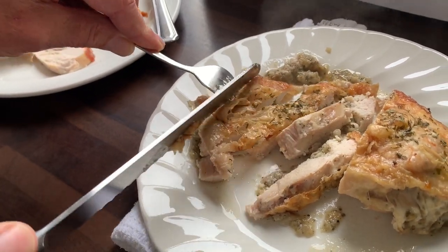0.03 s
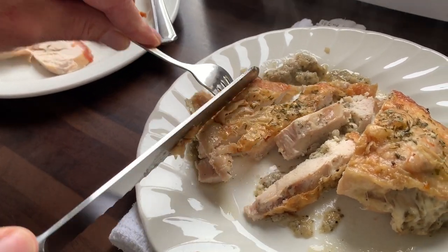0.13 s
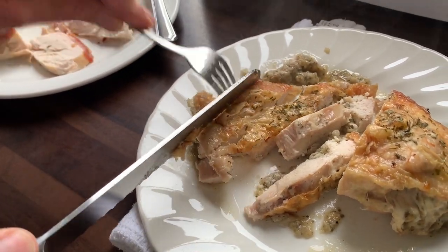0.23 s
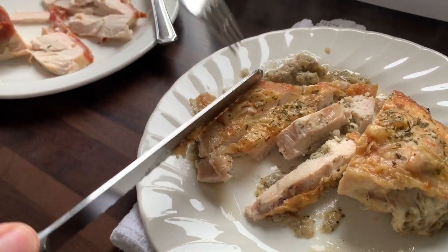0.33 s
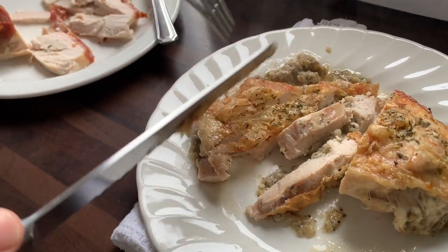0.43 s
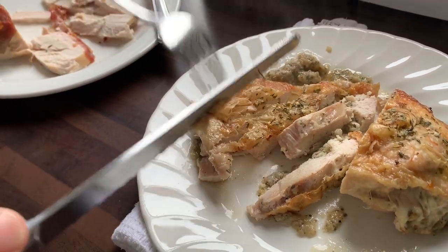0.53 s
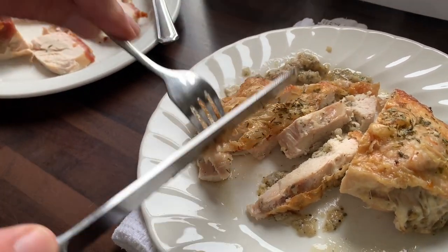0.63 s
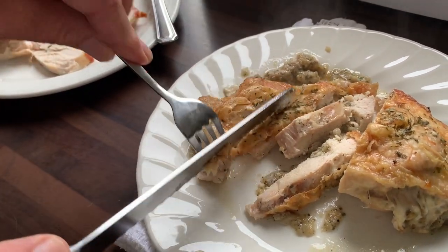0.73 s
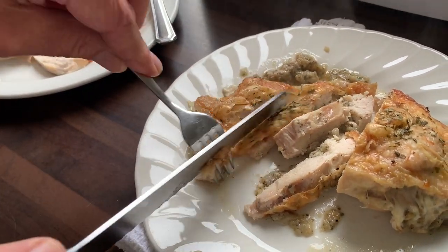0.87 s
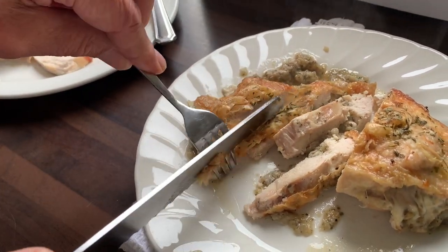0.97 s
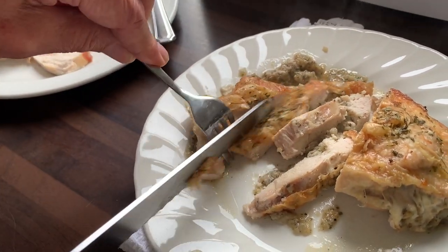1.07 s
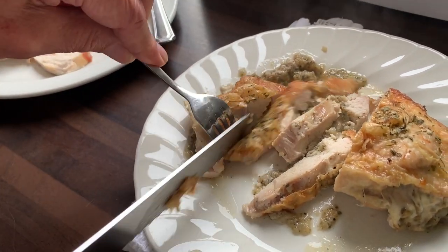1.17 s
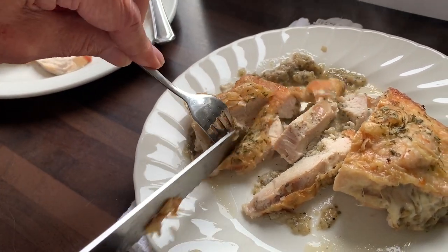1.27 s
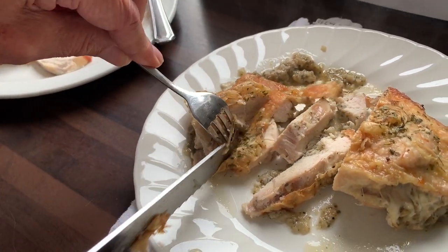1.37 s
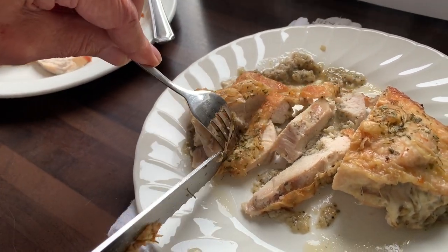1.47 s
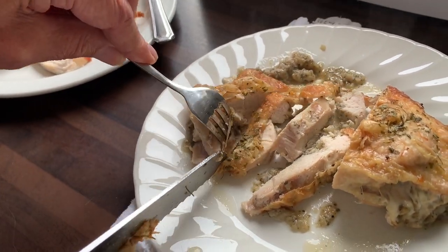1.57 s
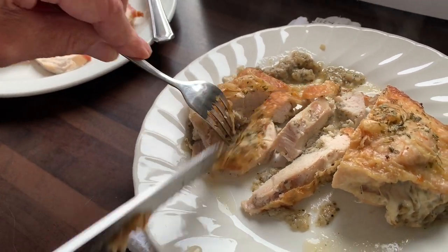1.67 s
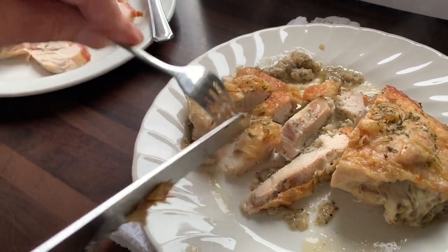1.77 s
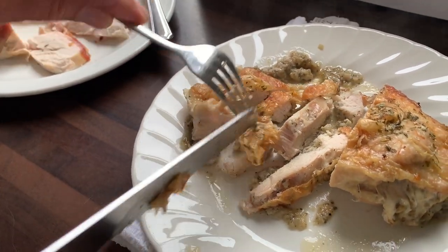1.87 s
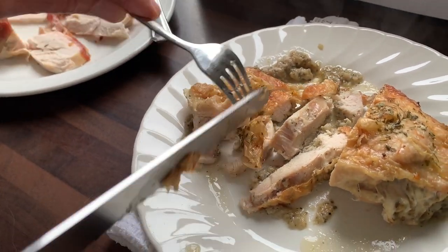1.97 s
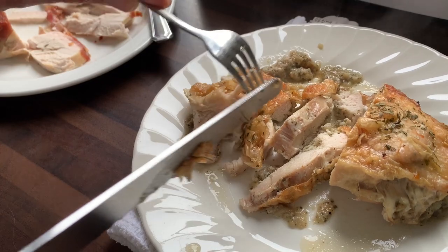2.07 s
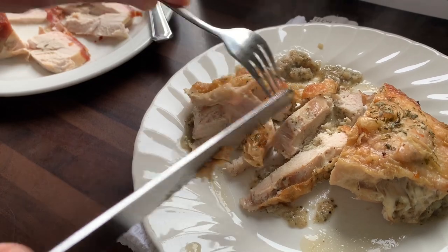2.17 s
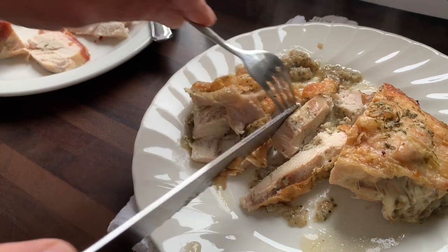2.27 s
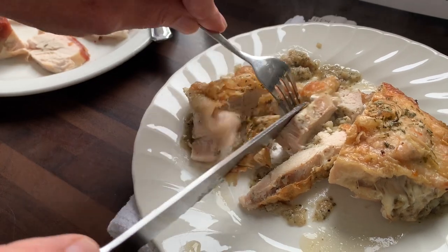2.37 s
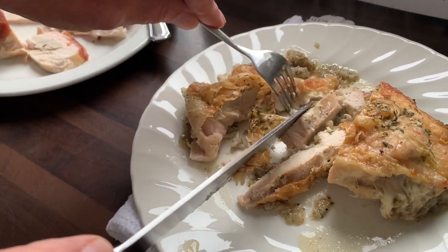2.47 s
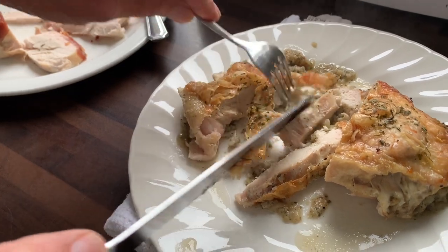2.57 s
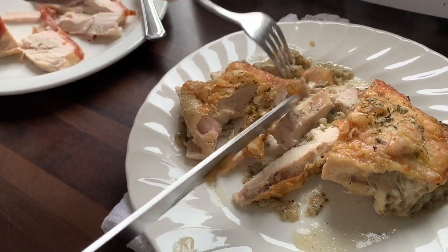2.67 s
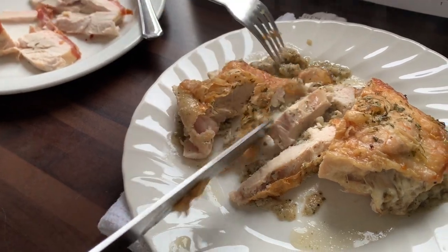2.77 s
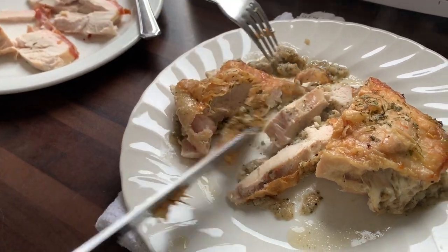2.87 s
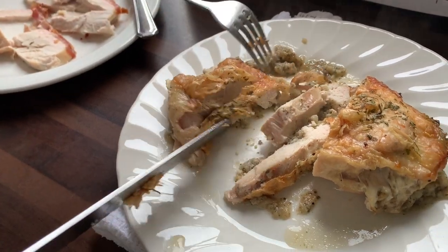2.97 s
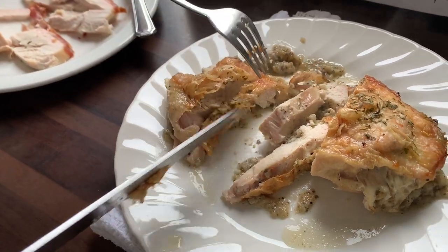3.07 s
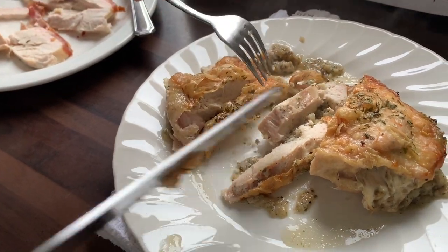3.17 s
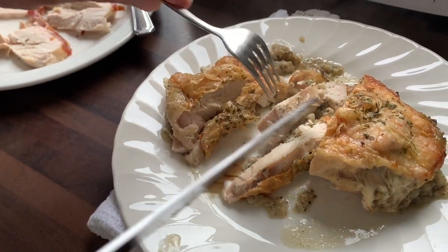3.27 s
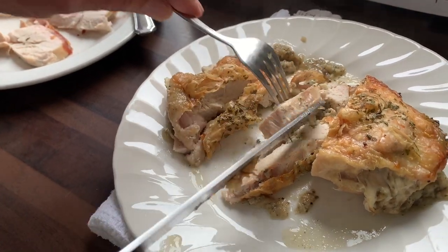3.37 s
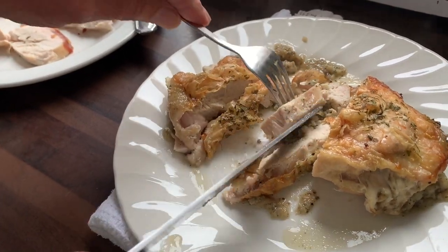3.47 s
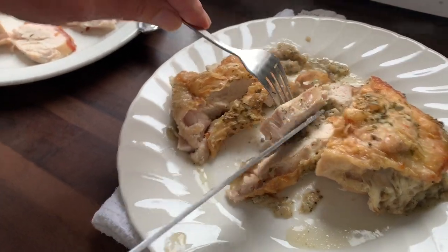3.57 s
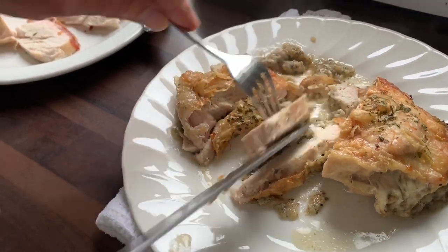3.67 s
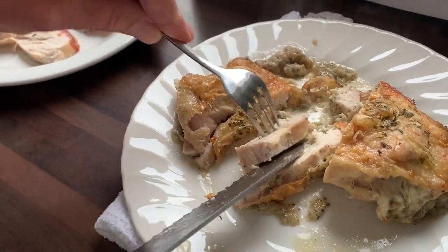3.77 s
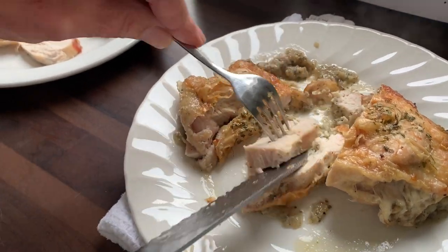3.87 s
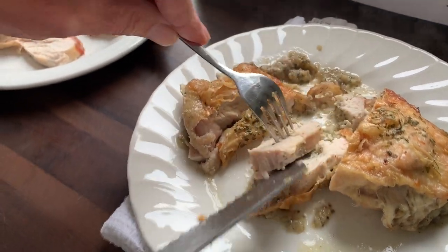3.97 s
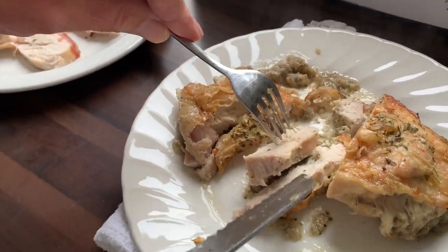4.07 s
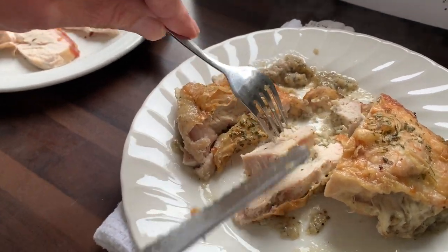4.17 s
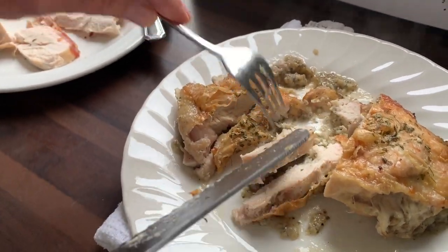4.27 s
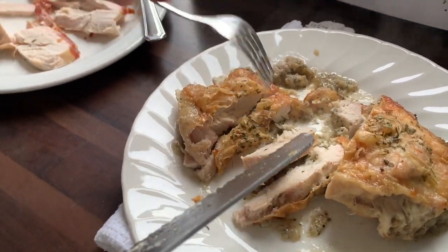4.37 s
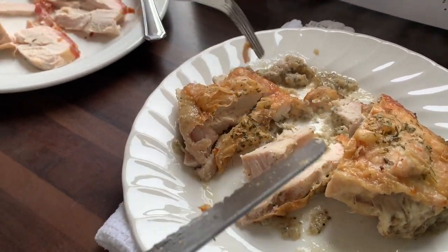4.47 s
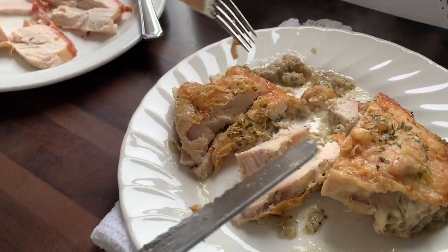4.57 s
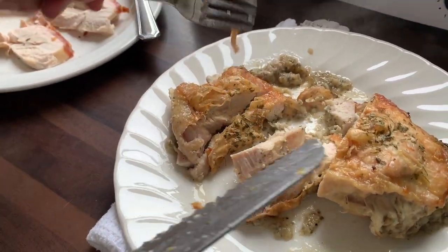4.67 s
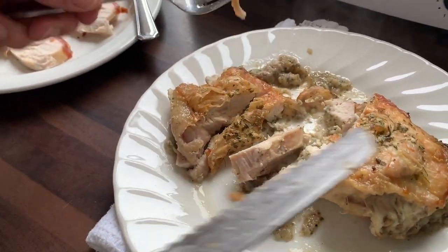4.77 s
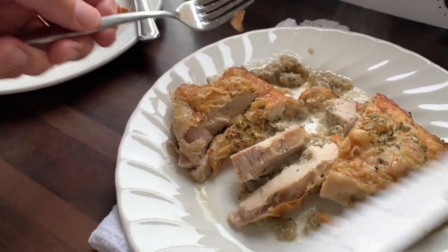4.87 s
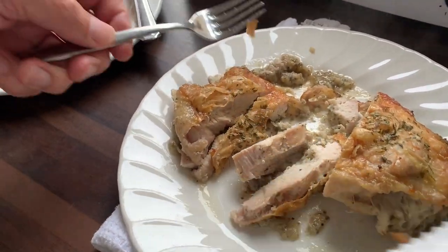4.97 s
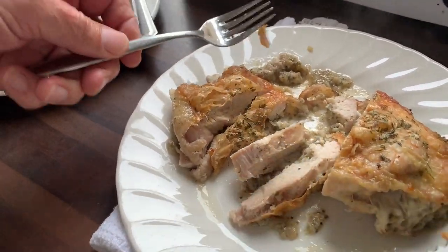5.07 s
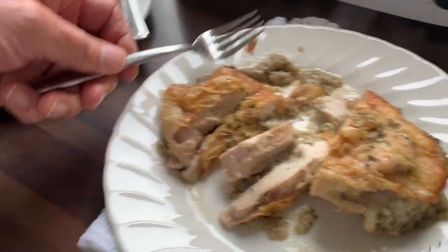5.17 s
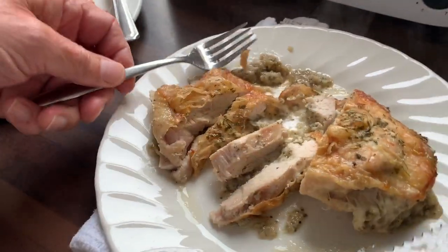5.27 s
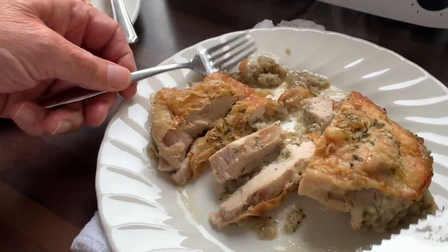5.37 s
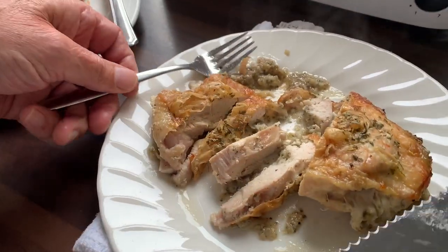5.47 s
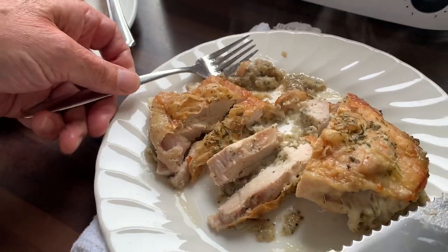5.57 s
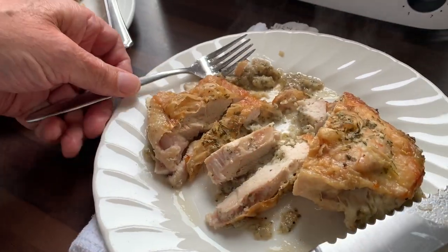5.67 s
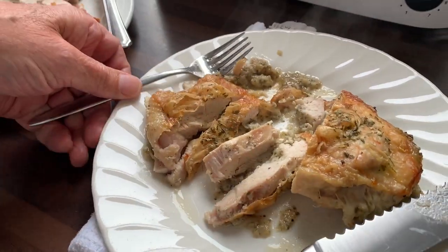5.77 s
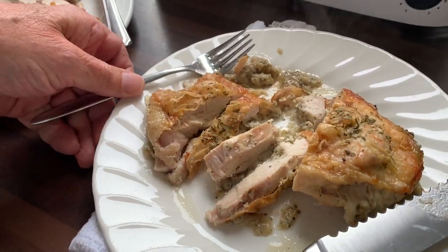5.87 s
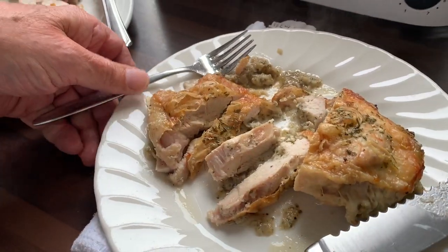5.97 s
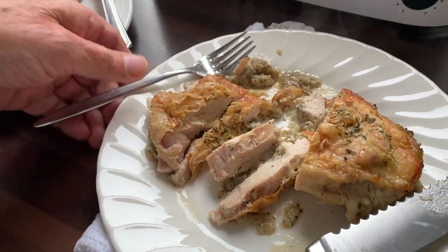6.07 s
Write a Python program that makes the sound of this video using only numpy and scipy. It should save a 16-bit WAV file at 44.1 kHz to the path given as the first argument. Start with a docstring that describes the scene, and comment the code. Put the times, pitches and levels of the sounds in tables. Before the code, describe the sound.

Very close to the microphone in a small kitchen, a knife and fork work on a china plate. Faint crumbly ticks and light scrapes come first, then a burst of squeaky scraping near one second, a second squeak later, a few hard knocks, a pause, and a final metallic rattle on the rim. A low unsteady hum runs beneath.

```python
"""In a kitchen, a steel knife and fork work on a china plate full of food, close to the microphone.
Blows and dying chatter excite plate and steel modes; stick-slip makes the blade squeak; uneven noise grains
make the slides, and short noise ticks the crumbs. At the end both are laid on the rim and rattle.
Behind lie an unsteady appliance hum, air noise, rumble and hiss; decaying noise gives the room's answer."""
import sys
import numpy as np
from scipy import signal
from scipy.fft import rfft, irfft, next_fast_len
from scipy.io import wavfile
from scipy.ndimage import uniform_filter1d

SR = 44100
rng = np.random.default_rng(int(sys.argv[2]) if len(sys.argv) > 2 else 0)


def wav_record(signal):
    """Record a signal, one row per channel, as 16-bit PCM in the file named by sys.argv[1]."""
    frames = np.transpose(np.atleast_2d(signal))
    bounded = np.clip(frames, -1, 1)
    # unit amplitude maps onto the largest positive 16-bit level
    quanta = np.round(bounded * 32767).astype(np.int16)
    wavfile.write(sys.argv[1], SR, quanta)


def invert_db(level):
    """Linear amplitude ratio for a level in decibels (20 dB per decade), elementwise."""
    return 10 ** (np.asarray(level, dtype=float) / 20)


N = 269451
FRAME = 2 ** 15  # samples in the frame of one short sound
FRAME_HZ = np.fft.rfftfreq(FRAME, 1 / SR)

# All levels are relative within a table, unless a comment says otherwise.
# Narrow bands of appliance hum: (f/Hz, full width at half amplitude/Hz, rms level/dB re full scale)
HUM_BANDS = [(113.8, 11, -60), (121.8, 24, -66.5), (186.6, 4.6, -63.5), (211.4, 39, -57.5), (297, 19, -64),
             (412.6, 4.4, -71), (518, 45, -67.5)]
# Spectrum of the air noise ahead of its bass roll-off: (f/Hz, level/dB)
AIR_SPECTRUM = [(13, -60), (22, -23.5), (75, -6.5), (108, 0.5), (141, -23.5), (159, -10.5), (207, -10),
                (427, -20.5), (530, -18), (613, -24.5), (1020, -24.5), (2000, -36), (7000, -52.5),
                (9100, -81.5), (15400, -120)]
# Spectrum of the microphone noise: (f/Hz, level/dB)
HISS_SPECTRUM = [(3000, -32), (6000, 0.5), (10000, -2.5), (15500, -4.5), (17000, -6.5)]
# Correlation of left and right in the background: (f/Hz, correlation from -1 to 1)
LIKENESS = [(30, 0.82), (180, .95), (550, 0.075), (1650, -0.43), (4970, 0.21), (15000, -0.81)]
# Decay of the room's answer: (f/Hz, t60/s)
ROOM_DECAY = [(300, .35), (2000, 0.34), (6000, 0.37), (14000, 0.028)]
# Crisp skin and moist meat letting go: (t/s, level/dB)
CRUMB_EVENTS = [(.1042, -39), (.1123, -41), (.1274, -42.5), (.1506, -48.5), (.161, -49), (.172, -41),
                (.1866, -54), (.286, -46), (0.296, -48.5), (.4024, -58), (.431, -58.5), (1.3706, -48),
                (1.4125, -50), (2.3254, -63.5), (2.3506, -56.5), (2.5785, -44.5), (2.62, -45),
                (2.9158, -33), (5.0861, -48)]
# Spectrum of a crumb: (f/Hz, level/dB)
CRUMB_SPECTRUM = [(800, -27), (2200, -9), (6000, 6), (11000, 4.5), (15500, 2)]
# Steel dragged along: (start of full level t/s, hold/s, grind level/dB, hiss over grind/dB)
DRAG_STROKES = [(.005, 0.0067, -48, -6), (.09, 0.19, -63.5, -9), (.81, .15, -59, 8),
                (1.04, 0.065, -48.5, 1.5), (1.13, 0.16, -44.5, -10.5), (1.36, 0.044, -55, -19),
                (2.41, 0.15, -60.5, -9), (5.29, 0.017, -30.5, -17.5), (5.35, 0.046, -35, -12.5),
                (5.45, 0.066, -46, -3)]
# Blade edge sticking and slipping: (t/s, length/s, mean slip rate f/Hz, level/dB, overtones/dB per step)
SQUEAK_EVENTS = [(.917, 0.0056, 2480, -29.5, -0.5), (0.946, 0.014, 2410, -27.5, -4.5),
                 (0.968, 0.035, 2454, -24, -4), (1.031, 0.015, 2400, -16.5, -5),
                 (1.038, 0.015, 2470, -17.5, -3.5), (1.05, 0.02, 2467, -13.5, -6),
                 (1.065, 0.021, 3360, -20, -14), (1.068, .012, 2577, -17, -10),
                 (1.08, 0.029, 2542, -17, -11), (1.065, .012, 5940, -21.5, -14.5),
                 (1.086, 0.048, 5877, -17, -14.5), (1.087, 0.014, 3420, -20, -11.5),
                 (1.092, 0.0036, 2747, -20, -7.5), (1.101, 0.043, 2955, -25.5, -2),
                 (1.526, 0.011, 2640, -36, -11), (1.535, 0.034, 2609, -31, 1),
                 (1.543, 0.033, 2578, -31, -7.5), (2.419, 0.0079, 2403, -13.5, -30),
                 (2.421, 0.016, 4110, -25, -26), (2.425, 0.023, 2400, -19, -27),
                 (2.442, 0.036, 2406, -22, -16), (2.456, .005, 2350, -15.5, -17),
                 (2.457, 0.013, 4190, -26.5, -22), (2.462, 0.0049, 2550, -25, -28),
                 (2.469, 0.027, 2365, -29.5, -31), (2.511, 0.0085, 2410, -24.5, -34),
                 (2.521, 0.012, 2465, -27, -20)]
# Modes of the china plate: (f/Hz, level/dB, t60/s ahead of contact damping)
PLATE_MODES = [(258, -21, .05), (457, -25, 0.091), (645, -26.5, .06), (870, -28, 0.066), (1390, 0, 0.052),
               (1660, -5.5, 0.05), (1876, -9, .05), (2245, -3, 0.067), (2274, -7.5, .06),
               (2446, -17.5, 0.25), (2491, -23.5, 0.1), (3235, -8, .07), (3360, -6.5, 0.036),
               (3595, -12, 0.081), (4096, -9, 0.096), (4900, -10.5, 0.08), (5960, -19, .05),
               (7050, -3.5, .04), (7400, -20.5, 0.058), (8100, -9.5, 0.12), (9550, -12.5, 0.097),
               (11000, -16.5, .06), (12360, -12, .07), (15300, -17.5, .07)]
# Modes of the knife blade: (f/Hz, level/dB, t60/s ahead of contact damping)
BLADE_MODES = [(501, -18, .15), (1062, -23, 1), (1413, -6, 0.017), (1758, -13, 0.51), (2370, -12.5, .08),
               (2567, -5, 0.079), (3190, -8, 0.21), (3520, -10.5, 0.13), (3696, -5, .07),
               (4206, -6.5, 0.048), (4590, -7.5, 0.072), (4650, -3, 0.042), (6110, -1, 0.074),
               (6480, 5, 0.058), (7606, 1, 0.064), (9230, -2, 0.05), (9800, -20.5, .1), (10630, -23, 0.036),
               (10830, -8, 0.04), (11470, -10, 0.037), (13860, -17, 0.046), (13600, -11, 0.076),
               (14200, -7.5, .1)]
# Modes of the fork: (f/Hz, level/dB, t60/s ahead of contact damping)
TINE_MODES = [(1014, -14, .13), (1240, -5.5, 0.051), (1800, -12, 0.2), (3400, -9.5, 0.079),
              (3570, -18, 0.23), (4392, -2, 0.077), (5050, -7.5, .04), (5800, -4.5, 0.054),
              (6200, -30.5, 0.54), (6350, -14.5, 0.18), (7250, -4, 0.1), (7493, -9, 0.16),
              (10660, -14, 0.052), (12100, -20.5, 0.14), (10000, -20, 0.13), (10000, -23.5, 0.15),
              (11900, -22, 0.11), (12500, -27.5, 0.16), (15280, -14, .08)]
# Spectrum of the contact tick: (f/Hz, level/dB)
TICK_SPECTRUM = [(150, -20), (400, -16), (1000, -10), (2500, 5), (5500, 0.5), (9000, 21), (13000, 6.5),
                 (16000, -15.5)]
# Knife on china: (t/s, level/dB, steel ring level/dB, hardness/dB per octave, chatter/s)
KNIFE_CONTACTS = [(.0024, -36, -6, 2.5, .02), (.9167, -18.5, 0.5, 0.5, 0.0028),
                  (.9475, -21.5, -6, 0.5, 0.01), (.9712, -23.5, -4.5, 5.5, 0.013),
                  (1.0329, -21.5, 3.5, 3.5, 0.017), (1.0547, -19.5, -7, 8, 0.0068),
                  (1.0865, -13, -7.5, 2.5, 0.011), (1.0978, -24.5, -4, 5, 0.0017),
                  (1.2049, -22.5, -10.5, 1.5, 0.012), (1.3118, -34.5, -16.5, 4.5, .012),
                  (2.4036, -13, -19.5, -2.5, 0.0073), (2.4225, -21.5, -9.5, 2.5, 0.005),
                  (2.4465, -29, -15, 4, 0.0081), (2.4545, -24.5, -18, 5, 0.01),
                  (2.5225, -43, -4.5, 3.5, 0.0054), (2.836, -3.5, -19.5, -1, .016),
                  (2.8457, -5, -19, -1.5, 0.019), (3.462, 2, -23, -1, 0.014),
                  (3.472, -11.5, -42.5, -4.5, 0.003), (5.158, -10.5, -1.5, -2, .018),
                  (5.1829, -10.5, -3, 0, 0.052), (5.2312, -9.5, -2, -0.5, 0.027),
                  (5.3363, -14.5, -6.5, -1.5, 0.018), (5.3468, -15, -2.5, 0, 0.053),
                  (5.421, -0.5, -6, 1, 0.013), (5.4459, -7, -11.5, 1.5, 0.027),
                  (5.4694, -10.5, -13, -0.5, 0.011)]
# Fork on china: (t/s, level/dB, steel ring level/dB, hardness/dB per octave, chatter/s)
FORK_CONTACTS = [(.6258, -24, -19.5, 11, 0.0081), (.6425, -27, -10, 9, 0.0079),
                 (.8134, -33.5, -12.5, 7.5, 0.03), (.883, -35.5, -13, 9, 0.019),
                 (.9005, -21, -13, 6.5, 0.011), (3.7395, -14, -4.5, 2.5, .014),
                 (5.5849, -16.5, -11.5, -4.5, .014), (5.594, -23.5, -8.5, -5, 0.023),
                 (5.732, -16, -8.5, -1, 0.0053)]


def unit(x):
    """Normalisation: the signal is scaled to rms 1."""
    return x / np.sqrt(np.mean(x ** 2) + 1e-20)


def along(points, hz):
    """Spectral interpolation: (f/Hz, value) points are joined on a logarithmic axis."""
    f, value = np.transpose(points)
    return np.interp(np.log(hz + 1), np.log(f + 1), value)


def filtered(x, response):
    """Linear filtering: the spectrum is multiplied by a complex response of frequency."""
    size = next_fast_len(N + SR)
    spectrum = rfft(x, size) * response(np.fft.rfftfreq(size, 1 / SR))
    return irfft(spectrum, size)[..., :N]


def causal(gain_db):
    """Minimum phase: folding the cepstrum makes a response of given levels start at the blow."""
    cepstrum = irfft(gain_db * np.log(10) / 20, FRAME)
    fold = np.r_[1, np.full(FRAME // 2 - 1, 2), 1, np.zeros(FRAME // 2 - 1)]
    return np.exp(rfft(cepstrum * fold))


def modes(table, hz, damping=1):
    """Modal resonance: a unit blow starts each damped oscillator at its level; one row per mode."""
    f, db, t60 = np.transpose(table)[:, :, None]
    width = damping * np.log(1000) / (np.pi * t60)
    return invert_db(db) * SR / np.pi * 1j * hz / (f * f - hz * hz + 1j * hz * width)


def radiated(table, count, scatter_db, damping):
    """Modal radiation: each mode reaches two ports in its own strength and phase; low modes agree in phase."""
    f = np.transpose(table)[0]
    gain = invert_db(scatter_db * rng.standard_normal((count, 2, len(f))))
    shared, apart = rng.standard_normal((2, count, 1, len(f)))
    turn = .4 * shared + .9 * apart * [[1], [-1]]
    turn = turn * np.minimum(f / 2500, 1)
    rows = modes(table, FRAME_HZ, damping)
    quadrature = rows / (1j * FRAME_HZ + 1)
    return (gain * np.cos(turn)) @ rows + (gain * np.sin(turn) * f) @ quadrature


def placed(times, sounds):
    """Superposition: short stereo sounds add on the time line."""
    out = np.zeros((2, N + FRAME))
    kept = FRAME - 4096  # the end of the frame is left out
    for start, sound in zip(times, sounds):
        out[:, round(start * SR):][:, :kept] += sound[:, :kept]
    return out[:, :N]


def noise_pair(gain):
    """Partial coherence: mid and side noise mix to a pair of rms 1 with a set correlation per frequency."""
    turn = lambda hz: np.arccos(np.clip(along(LIKENESS, hz), -1, 1)) / 2
    split = lambda hz: gain(hz) * [np.cos(turn(hz)), np.sin(turn(hz))]
    mid, side = filtered(rng.standard_normal((2, N)), split)
    return unit(np.array([mid + side, mid - side]))


def rumble():
    """Slow amplitude modulation: low noise wavers and swells once near 1.3 s."""
    t = np.arange(N) / SR
    sway = uniform_filter1d(rng.standard_normal(N), size=9000)
    sway = unit(uniform_filter1d(sway, size=9000))
    swell_s, swell_width_s, swell_db = 1.3, 0.24, 10
    swell = swell_db * np.exp(-((t - swell_s) / swell_width_s) ** 2)
    level_db, sway_db = -62, -1
    return invert_db(level_db + sway_db * sway + swell) * noise_pair(lambda hz: 1 / (1 + ((hz - 62) / 22) ** 2))


def appliance():
    """Frequency modulation: a motor tone drifts about 105 Hz, among narrow bands of resonant noise."""
    drift = unit(uniform_filter1d(rng.standard_normal(N), size=3000))
    motor = invert_db(-47) * np.sin(2 * np.pi * np.cumsum(105 + 3.0 * drift) / SR)
    bands = sum(invert_db(db) * noise_pair(lambda hz: 1 / (1 + (2 * (hz - f) / width) ** 2))
                for f, width, db in HUM_BANDS)
    return motor + bands


def air():
    """Broadband noise: random pressure is shaped by a spectrum and a bass roll-off at 105 Hz."""
    return invert_db(-52) * noise_pair(lambda hz: invert_db(along(AIR_SPECTRUM, hz)) / (1 + (105 / (hz + 1)) ** 2))


def microphone_hiss():
    """Self-noise: a steady random signal lies chiefly in the treble."""
    return invert_db(-75.5) * noise_pair(lambda hz: invert_db(along(HISS_SPECTRUM, hz)))


def kitchen():
    """Superposition of independent background sources."""
    return appliance() + air() + rumble() + microphone_hiss()


def room(x):
    """Reverberation: each piece of sound gets a freshly drawn noise tail, decaying at a rate set by frequency."""
    step = 8192  # samples, about a fifth of a second
    pieces = np.pad(x.mean(0), (0, -N % step)).reshape(-1, 1, step)
    noise = rng.standard_normal((len(pieces), 2, FRAME - step - 512))
    hz, t, z = signal.stft(noise, SR, nperseg=256)
    decay = invert_db(-60 * t / along(ROOM_DECAY, hz)[:, None])
    tails = signal.istft(z * decay, SR, nperseg=256)[1]
    tails = tails / np.linalg.norm(tails, axis=2, keepdims=True)
    delay_s = 0.0035
    times = np.arange(len(pieces)) * step / SR + delay_s
    return placed(times, signal.fftconvolve(pieces, tails, axes=2))


def crumbs():
    """Impulsive release: dry noise ticks last a few milliseconds, with no ring."""
    s, db = np.transpose(CRUMB_EVENTS)
    t60 = 0.003  # s
    snap = rng.standard_normal((len(s), 1, FRAME)) * invert_db(-60 * np.arange(FRAME) / SR / t60)
    colour = invert_db(db)[:, None, None] * causal(along(CRUMB_SPECTRUM, FRAME_HZ))
    return placed(s, irfft(rfft(snap) * colour, FRAME) * [[1], [1]])


def stroke_levels():
    """Envelopes: each stroke rises, holds and falls; returns the grind and hiss sums."""
    s, hold, db, hiss_db = np.transpose(DRAG_STROKES)[:, :, None]
    t = np.arange(N) / SR
    rise, fall = 500.5 * (t - s), 221 * (s + hold - t)  # slopes in dB per second
    level = invert_db(db + np.minimum(0, np.minimum(rise, fall)))
    return level.sum(0), (invert_db(hiss_db) * level).sum(0)


def slide():
    """Sliding friction: steel over glaze and food gives dense uneven grains, partly through the damped blade."""
    grind, hiss = stroke_levels()
    unevenness_db = 45 * uniform_filter1d(rng.standard_normal(N), size=150)
    grains = rng.standard_normal((2, N)) * invert_db(unevenness_db)
    signs = np.cos(np.arange(len(BLADE_MODES)) * np.pi)  # neighbouring modes alternate in sign
    blade = lambda hz: signs @ modes(BLADE_MODES, hz, damping=6.0)
    drag = filtered(grains, lambda hz: blade(hz) + invert_db(20 + along(TICK_SPECTRUM, hz)))
    low = filtered(drag, lambda hz: 1 / (1 + (hz / 6000) ** 8))
    return grind * unit(low) + hiss * unit(drag - low)


def squeaks():
    """Stick-slip: slips at the blade's own rate form a rough harmonic stack, a little different at each port."""
    s, length, hz, db, step_db = np.transpose(SQUEAK_EVENTS)[:, :, None]
    t = np.arange(2048) / SR
    u = np.clip(t / length, 0, 1)
    jitter = rng.standard_normal((2, len(s), len(t)))
    rate_jitter, force_jitter = unit(uniform_filter1d(jitter, size=40))
    sag = .01  # share by which the slip rate falls during a squeak
    rate = hz * (1 + sag * (.5 - u)) * (1 + .04 * rate_jitter)
    phase = 2 * np.pi * np.cumsum(rate, axis=1) / SR
    stack = sum(invert_db(step_db * (k - 1)) * np.sin(k * phase + k * k) for k in range(1, 6))
    force = invert_db(db + 0.5 * force_jitter) * np.sin(np.pi * u ** 0.34) * stack
    ports = np.exp(.6j * rng.standard_normal((len(s), 2, 1))) / (1 + (FRAME_HZ / 9000) ** 4)
    return placed(s[:, 0], irfft(rfft(force, FRAME)[:, None] * ports, FRAME))


def tilted(slope_db):
    """Contact stiffness: harder contacts push more treble."""
    return causal(np.outer(slope_db, np.log2((FRAME_HZ + 200) / 3000)))[:, None]


def contacts(table, steel, medium_db, loss, tick_db):
    """Impact: a blow and dying micro-bounces make plate and steel ring together."""
    s, db, steel_db, hardness_db, chatter = np.transpose(table)
    plate_db = medium_db - loss * hardness_db  # light hard tips move little china
    t = np.arange(FRAME) / SR
    chatter = np.clip(chatter, .001, .2)[:, None]
    landing = np.minimum(0.006 / chatter, 1)  # a long rattle starts with a softer landing
    blow = rfft(landing * invert_db(-60 * t / 0.00016))[:, None]
    bounces = rng.standard_normal((len(s), FRAME)) * invert_db(-8 * (t / chatter) ** 1.3)
    bounces = rfft(0.12 * bounces)[:, None]

    ring = irfft(radiated(steel, len(s), scatter_db=0.5, damping=1.8), FRAME)
    ring = rfft(ring * invert_db(-7000 * chatter * t)[:, None])  # steel that keeps touching is damped
    china = radiated(PLATE_MODES, len(s), scatter_db=3.5, damping=2.6)
    body = invert_db(plate_db - 19.5)[:, None, None] * china + invert_db(steel_db - 14.5)[:, None, None] * ring
    body = body * (1j * FRAME_HZ / (1j * FRAME_HZ + 150)) ** 2  # bass cut

    tick = causal(tick_db + along(TICK_SPECTRUM, FRAME_HZ)) * (blow + .22 * bounces)
    spectrum = tilted(hardness_db) * ((blow + bounces) * body + tick)
    sound = irfft(invert_db(db)[:, None, None] * spectrum, FRAME)
    # random level wobble roughens the ring, growing over the first 10 ms
    wobble = unit(uniform_filter1d(rng.standard_normal((len(s), 1, FRAME)), size=300))
    return placed(s, sound * invert_db(1.5 * wobble * np.minimum(t / .01, 1)))


def scene():
    """Superposition: cutlery near the microphone, its room and the kitchen behind."""
    knife = contacts(KNIFE_CONTACTS, BLADE_MODES, medium_db=-7, loss=.4, tick_db=-5.0)
    fork = contacts(FORK_CONTACTS, TINE_MODES, medium_db=-3, loss=1.2, tick_db=-5.5)
    near = knife + fork + crumbs() + squeaks() + slide()
    return near + invert_db(-11.5) * room(near) + kitchen()


def band_limit(x):
    """A steep low-pass at the top of the band."""
    return signal.sosfilt(signal.butter(12, 17160, fs=SR, output="sos"), x)


def record(dry):
    """Comb interference: above 6.6 kHz one port feeds both channels, a fifth of a millisecond apart."""
    single = lambda hz: 1 / (1 + (6600 / (hz + 1)) ** 12)
    twist = lambda hz: np.exp(np.outer([-1j, 1j], np.pi * (hz - 11000) / 4870))  # in phase at 11 kHz
    two_ports = filtered(dry, lambda hz: 1 - single(hz))
    one_port = filtered(dry[0], lambda hz: single(hz) * twist(hz))
    wide = filtered(two_ports + one_port, lambda hz: 1 / (1 + (hz / 16000) ** 30))
    wide = wide / (1 + np.abs(wide / .97) ** 6) ** (1 / 6)  # the input stage rounds off the loudest peaks
    return band_limit(wide)


dry = scene()
out = record(dry)
wav_record(out)
```